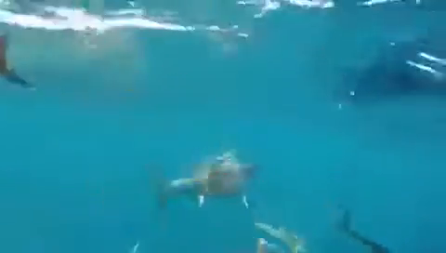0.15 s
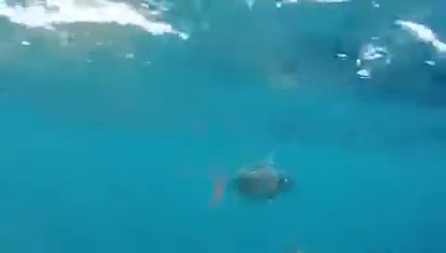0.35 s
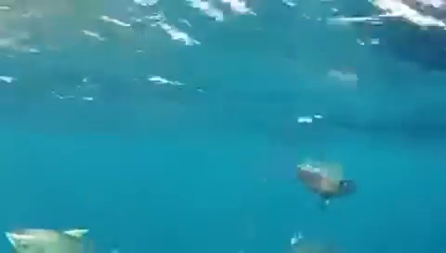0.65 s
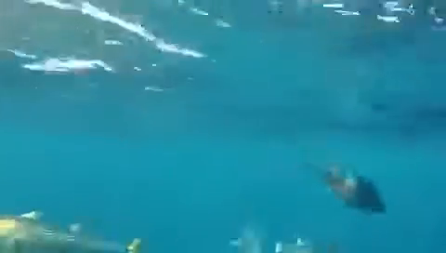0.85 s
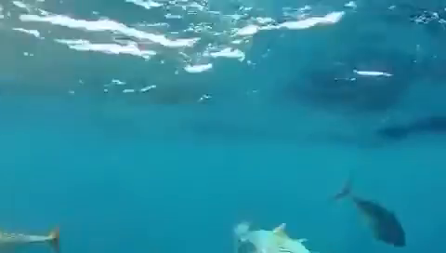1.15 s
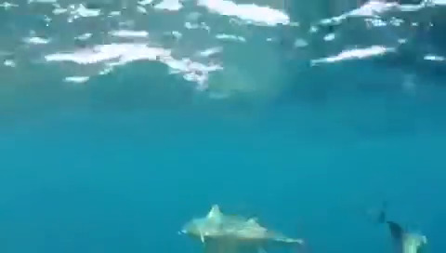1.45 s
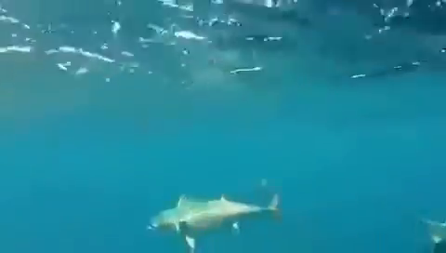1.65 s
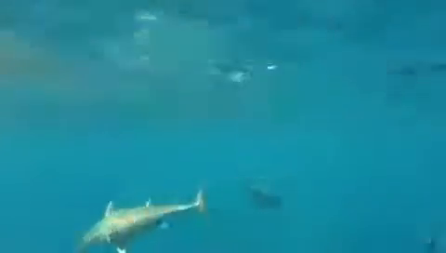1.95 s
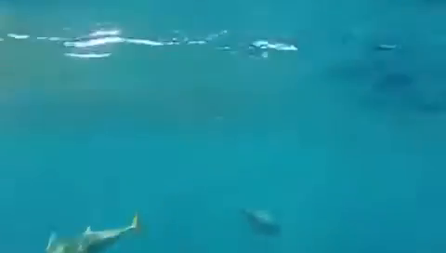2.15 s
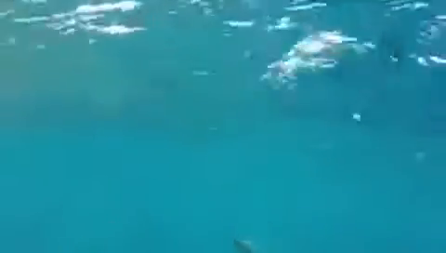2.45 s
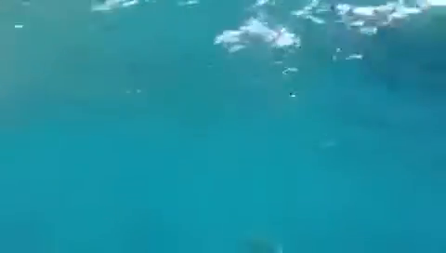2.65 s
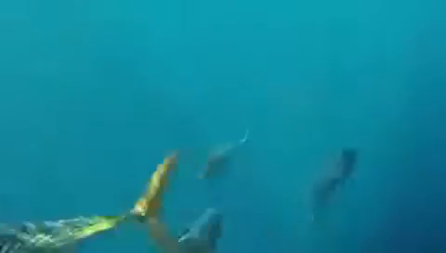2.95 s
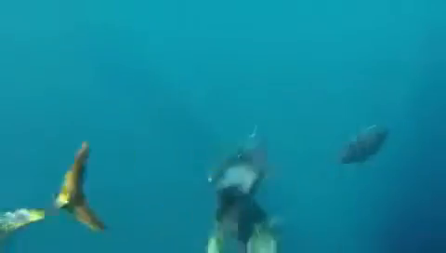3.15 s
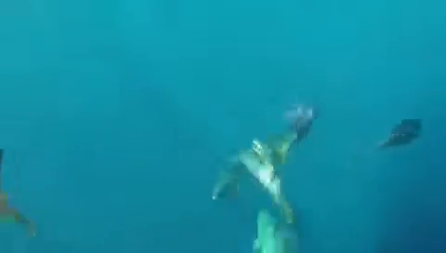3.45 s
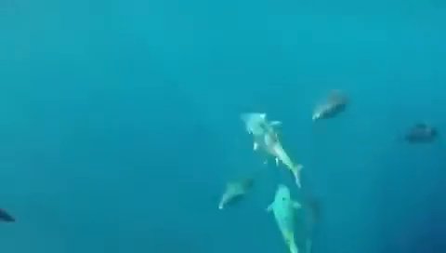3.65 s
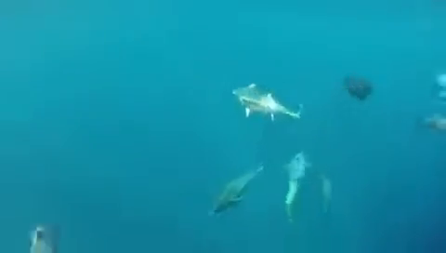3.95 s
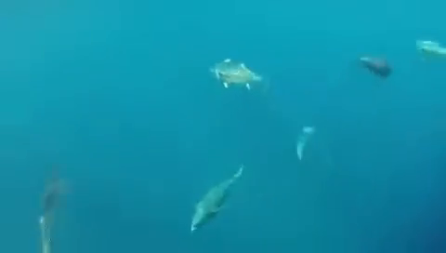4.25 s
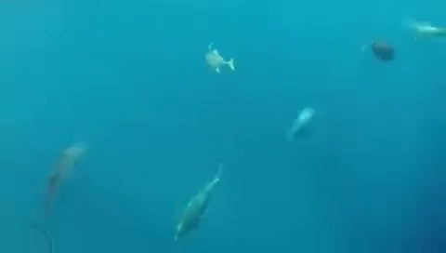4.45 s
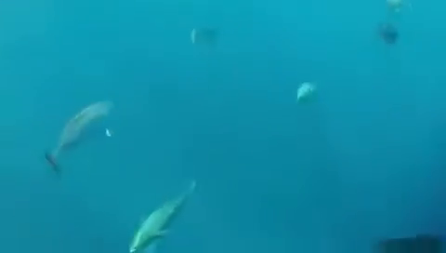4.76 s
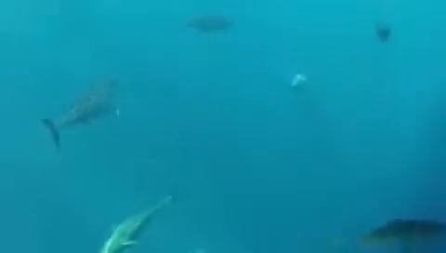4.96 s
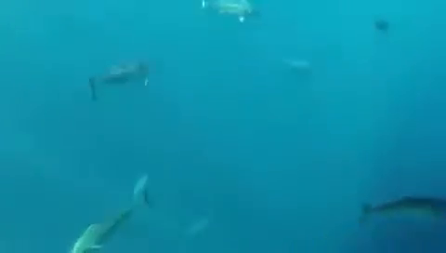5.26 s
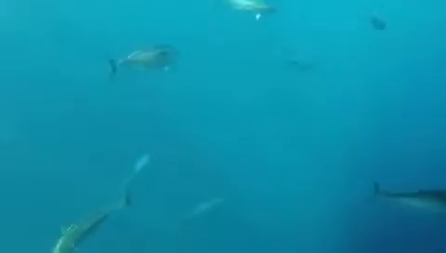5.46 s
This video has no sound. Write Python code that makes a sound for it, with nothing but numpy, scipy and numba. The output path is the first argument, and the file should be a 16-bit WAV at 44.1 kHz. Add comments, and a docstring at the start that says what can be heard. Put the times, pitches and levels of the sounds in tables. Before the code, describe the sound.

Muffled twin-engine hum heard through seawater, with bumps, tiny ticks and bubble plinks, dipping briefly to silence midway before returning stronger.

```python
"""A boat's two engines drone through the sea, heard by a camera microphone in a sealed housing.
Beating sines on the shaft orders make the drone; noise in hull and housing resonances adds boom, rattle and wash.
The housing is bumped, bubbles plink and tick, water surges on it, and a thin hiss of bubbles lies behind.
A far shot fades out and a nearer one fades in.
The camera samples slowly and holds each value, which mirrors the drone into the treble."""
import sys
import numpy as np
from scipy import signal
from scipy.fft import rfft, irfft
from scipy.io import wavfile
from scipy.ndimage import uniform_filter1d
from numba import njit

SR = 44100
rng = np.random.default_rng(int(sys.argv[2]) if len(sys.argv) > 2 else 0)


def store_pcm(level_fs):
    """Save levels as 16-bit WAV."""
    pcm = np.round(np.clip(level_fs, -1, 1) * 32767).astype(np.int16)
    wavfile.write(sys.argv[1], SR, np.atleast_2d(pcm).T)


N = 246959

# Bubble hiss in the open sea. Each row: frequency in Hz, relative density in dB per Hz.
SEA_COLOUR = [(1350, -24), (2300, -4), (3000, -12.5), (3490, -18.5), (3930, -9), (4370, -17.5),
              (4920, -16.5), (5900, -18), (7670, -53), (13000, -120)]
# Blows on the housing. Each row: start in seconds, peak in dB, contact in ms (width at half force).
BUMPS = [(1.069, -37.5, 1.06), (1.099, -27.5, 1.56), (1.1084, -28, 1), (1.1165, -34.5, 2.8),
         (1.128, -34.5, 1.1)]
# How the struck housing rings. Each row: frequency in Hz, relative level in dB, 60 dB decay in seconds.
HOUSING_MODES = [(56, 10, 0.14), (184, 9.5, 0.11), (377, 7.5, 0.15), (523, 11, 0.03), (684, 5, 0.056),
                 (985, -11, .03)]
# Short rings of bubbles and of taps on the housing.
# Each row: start in seconds, peak in dB, frequency in Hz, 60 dB decay in seconds.
PLINKS = [(2.426, -60, 5400, .02), (2.4445, -34, 650, 0.012), (2.448, -37.5, 1017, .03),
          (2.449, -40, 1250, 0.016), (2.472, -47.5, 2850, 0.041), (2.559, -36.5, 1358, 0.084),
          (2.557, -44, 1670, 0.044), (3.714, -45, 2860, 0.034), (4.199, -38.5, 1670, 0.044),
          (4.431, -46, 1710, .03), (4.654, -50, 1670, 0.028)]
# Tiny ticks. Each row: start in seconds, ring peak in dB, snap peak in dB.
TICKS = [(1.348, -48, -56), (1.367, -60, -40.5), (1.671, -53, -55), (1.684, -57, -59), (1.701, -60, -62),
         (1.716, -52, -44), (1.7205, -49, -50), (1.726, -61, -61), (1.746, -56, -57), (1.772, -47, -47),
         (1.800, -61, -61), (1.8097, -54, -56), (1.820, -60, -62), (1.913, -60, -62), (1.925, -62, -64),
         (3.885, -68, -60), (3.894, -66, -61), (3.913, -59, -57), (4.179, -68, -58), (5.377, -62, -53)]
# Water surging on the housing. Each row: moment in seconds, level of the low rumble in dB.
SURGES = [(.3, -70), (1.25, -57), (1.65, -51.5), (2.5, -62), (3.15, -57), (3.63, -55), (4.15, -63),
          (4.64, -53), (5.08, -50), (5.5, -52)]
# A wider hiss in the near shot. Each row: time in seconds, level in dB.
NEAR_HISS_LEVELS = [(3.1, -75), (4.1, -73.5), (4.6, -81.5), (5.1, -81), (5.4, -75)]
# Low resonances of hull and housing that noise rings.
# Each row: frequency in Hz, width of one pass in Hz, relative level in dB.
BOOM_MODES = [(116.3, 39, -6), (203, 84, -4), (369, 355, -1.5), (479.4, 100, -3), (666.6, 127, 0.5)]
# Higher resonances of hull and housing.
# Each row: frequency in Hz, width of one pass in Hz, relative level in dB.
RATTLE_MODES = [(968, 47, -10.5), (1370, 156, 1.5), (1902, 165, 3), (2200, 400, -3.5), (2856, 750, -5),
                (2875, 270, -17.5)]
# The boat in the far shot, then in the near one. Each row: time in seconds, drone in dB, rattle in dB.
SHOT_LEVELS = [
    [(0.0, -45, -53.5), (0.39, -42.5, -51.5), (1.1, -43, -51), (1.25, -44, -52), (2.34, -46.5, -56),
     (2.93, -42.5, -50.5)],
    [(3.1, -38, -48), (3.31, -37, -47), (4.52, -32.5, -48.5), (4.86, -32.5, -47.5), (5.14, -32, -47),
     (5.6, -31, -47.5)],
]
# Shaft orders from afar. Each row: multiple of the shaft rate, relative level in dB.
FAR_ORDERS = [(1, -15.5), (2, -17), (3, -15.5), (4, -5.5), (5, -10), (6, -15.5), (7, -7.5), (8, -15.5),
              (9, -16.5), (10, -11), (11, -2), (12, -10), (13, -4.5), (14, -0.5), (15, -9.5), (16, -3),
              (17, -9), (18, -15), (19, -11.5), (20, -16), (21, -15), (22, -12.5), (23, -11), (24, -2),
              (25, -13.5), (26, -10.5), (27, -6.5), (28, -6.5), (29, -12.5), (30, -7), (31, -16.5),
              (32, -18.5), (33, -17), (34, -23.5), (35, -22), (36, -24), (37, -18.5), (38, -20.5),
              (39, -38), (40, -15.5), (41, -14), (42, -24.5), (43, -47), (44, -35), (45, -35), (46, -35),
              (47, -34), (48, -24), (49, -24), (50, -14), (51, -26.5), (52, -20.5), (53, -12), (54, -19),
              (55, -33), (56, -16.5), (57, -37), (58, -18.5), (59, -24), (60, -31), (61, -31), (62, -21),
              (63, -27.5), (64, -26.5), (65, -32), (66, -41), (67, -27), (68, -23), (69, -20), (70, -25.5),
              (71, -14), (72, -14), (73, -7), (74, -12), (75, -21.5), (76, -10.5), (77, -17), (78, -22.5),
              (79, -15), (80, -18), (81, -31), (82, -23), (83, -16.5), (84, -15), (85, -25), (86, -35)]
# Shaft orders from nearer. Each row: multiple of the shaft rate, relative level in dB.
NEAR_ORDERS = [(1, -20), (2, -22), (3, -21), (4, -2.5), (5, -7), (6, -11), (7, -14.5), (8, -8.5), (9, -13),
               (10, -5.5), (11, -4), (12, -10), (13, -5), (14, -0.5), (15, -8.5), (16, -1), (17, -9),
               (18, -17), (19, -18), (20, -14), (21, -23), (22, -13.5), (23, -14), (24, -3.5), (25, -21.5),
               (26, -16), (27, -25.5), (28, -10.5), (29, -20), (30, -8), (31, -16), (32, -18.5),
               (33, -16.5), (34, -26.5), (35, -30), (36, -27), (37, -38), (38, -32), (39, -46), (40, -16.5),
               (41, -21), (42, -38), (43, -37), (44, -48), (45, -45), (46, -41), (47, -51), (48, -34),
               (49, -26), (50, -24), (51, -21), (52, -24), (53, -16.5), (54, -24), (55, -19.5), (56, -25),
               (57, -28), (58, -25.5), (59, -36), (60, -25.5), (61, -31.5), (62, -32), (63, -27), (64, -38),
               (65, -32), (66, -40), (67, -41), (68, -33), (69, -24), (70, -19.5), (71, -32), (72, -24),
               (73, -21.5), (74, -16.5), (75, -33), (76, -35), (77, -22), (78, -32), (79, -28), (80, -41.5),
               (81, -33), (82, -31), (83, -19), (84, -27), (85, -28.5), (86, -40.5)]
# Orders of the second engine. Each row: multiple of the shaft rate, relative level in dB far and near,
# moment in step with the first engine in seconds, far and near.
TWIN_ORDERS = [(4, -23.5, -17.5, 2.34, 4.72), (7, -16.5, -10.5, 1.516, 4.88), (8, -10, -6, 1.94, 4.41),
               (10, -16, -10, 1.656, 5.5), (13, -24, -15, 1.62, 5.6), (14, -14.5, -17, 1.68, 4.4),
               (24, -11.5, -22, 1.51, 4.45)]
# Orders that grow or sink as the camera moves. Each row: multiple, slope in dB per second far and near.
ORDER_DRIFT = [(4, 0, -.5), (5, 0, -3), (8, -3, 1.5), (10, -0.1, -1), (12, 1, -2.5), (11, 0, 2.5),
               (14, -0.5, 1.5), (16, 0.5, 2.2), (17, 3.5, 0.5), (24, 3, 3), (30, 2.5, -7.5), (26, 2, 0),
               (27, 1, -4), (31, -1, -6), (32, 3, 2.5), (40, 1, 1.5), (73, -0.5, -2.5)]
# Single orders that swell or dip for a moment.
# Each row: centre in seconds, multiple, change in dB, time from centre to 1/e in seconds.
ORDER_SWELLS = [(.7, 73, 4, 0.31), (.7, 28, 3, .4), (.65, 30, -9, .15), (2.05, 4, -5.5, .15),
                (2.6, 4, -7, .15), (3.6, 8, -6, 0.38), (3.6, 24, -6, 0.16), (3.9, 30, 5.5, 0.27),
                (4.62, 5, -12, 0.23), (4.85, 4, 3, .15), (5.13, 4, -9, .1), (5.15, 5, -13, .1),
                (5.452, 5, 6.5, .2)]

SEA_DB = -67
TICK_HZ, TICK_T60_S, SNAP_HZ, SNAP_T60_S = 5120, 0.011, 4300, 0.002
SNAP_DELAY_S = 0.0004  # the ring starts first but builds more slowly
FAINT_TICKS, FAINT_DB = 10, -68  # strewn at random, each up to 6 dB weaker
SURGE_S, CALM_DB = 0.15, -32.5  # time from peak to 1/e; the calm between, against the drone
GEAR_HZ, GEAR_WIDTH_HZ, GEAR_DB = 3893, 110, -75
NEAR_HISS_HZ, NEAR_HISS_WIDTH_HZ = 3850, 420
SHAFT_HZ, TWIN_FASTER_HZ = 25.825, 0.2457  # the second engine turns a little faster
WANDER_RAD, WANDER_PER_S = 0.036, 2.5  # the shaft runs a little ahead and behind
RATTLE_FROM = 35  # first order that belongs to the rattle
BOOM_DB, RATTLE_DB = -6.5, -3  # wash against the tones
FIRM_DB, FIRM_SHARE = -9, 0.58  # orders louder than this swell at random only by this share
FAR_MIDDLE_S, NEAR_MIDDLE_S = 1.5, 4.3  # where the drift of the orders crosses zero
CUT_S, FADE_OUT_S, FADE_IN_S, FADE_POWER = 3.0115, 0.11, 0.095, 0.99
EASE_S = 0.004
GUARD_HZ, CAMERA_HZ, HOLD, TOP_HZ = 5700, 12000, 4, 15020  # HOLD in fast samples


def undb(db):
    """Amplitude factor of a level in dB."""
    return 10 ** (np.asarray(db) / 20)


def level(x, db):
    """Scale to an rms level in dB."""
    return x * undb(db) / np.sqrt(np.mean(x ** 2))


def walk(rate):
    """Random levels joined by straight lines, rate a second; spread near 1.3."""
    steps = rng.standard_normal(int(N / SR * 60) + 2)
    return np.interp(np.arange(N) / SR * rate, np.arange(len(steps)), steps) * 1.61


def ring(x, hz, width):
    """Resonance applied twice, for dark valleys."""
    b, a = signal.iirpeak(hz, hz / width, SR)
    once = signal.lfilter(b, a, x)
    return signal.lfilter(b, a, once)


def add(out, s, sound):
    """Place a sound at s seconds."""
    i = int(s * SR)
    out[i:i + len(sound)] += sound[:len(out) - i]


def mode(hz, t60, rise_cycles):
    """A damped ring that builds smoothly over its first cycles."""
    t = np.arange(int(t60 * SR)) / SR
    risen = np.minimum(t * hz / max(rise_cycles, .01), 1)
    build = np.sin(np.pi / 2 * risen) ** 2
    decay = np.exp(-np.log(1000) * t / t60)
    return np.sin(2 * np.pi * hz * t) * decay * build


def wash(modes, turn, throb, flicker_db):
    """Noise in resonances, throbbing with the firings (two a turn), each flickering alone."""
    out = 0
    for hz, width, db in modes:
        beat = 1 + throb * np.cos(2 * turn + rng.uniform(0, 2 * np.pi))
        noise = level(ring(rng.standard_normal(N), hz, width), db)
        out = out + noise * beat * undb(flicker_db * walk(12.))
    return level(out, 0)


def sea():
    """Thin hiss of tiny bubbles: coloured noise, a little grainy."""
    hz = np.arange(N // 2 + 1) * SR / N + 1e-9
    colour_hz, colour_db = np.transpose(SEA_COLOUR)
    colour = undb(np.interp(np.log(hz), np.log(colour_hz), colour_db))
    grains = rng.standard_normal(N) * undb(1.7 * walk(55.) + .7 * walk(6.))
    return level(irfft(rfft(grains) * colour, N), SEA_DB)


def plinks_and_ticks():
    """Bubbles and light taps: short damped rings, each tick with a broad snap besides."""
    out = np.zeros(N)
    faint = [(a * N / SR, FAINT_DB - 6 * b, FAINT_DB - 6 * c) for a, b, c in rng.random((FAINT_TICKS, 3))]
    rings = [(row, 3.) for row in PLINKS]  # with the cycles each takes to build
    for s, ring_db, snap_db in TICKS + faint:
        rings.append(((s, ring_db, TICK_HZ, TICK_T60_S), 5.))
        rings.append(((s + SNAP_DELAY_S, snap_db, SNAP_HZ, SNAP_T60_S), .5))
    for (s, db, hz, t60), rise_cycles in rings:
        sound = mode(hz, t60, rise_cycles)
        add(out, s, undb(db) * sound / np.abs(sound).max())
    return out


def bumps():
    """A blow pushes the housing and lets it spring back; a longer, softer one leaves upper modes quiet."""
    out = np.zeros(N)
    body = np.zeros(SR // 4)
    for hz, db, t60 in HOUSING_MODES:
        add(body, 0, undb(db) * mode(hz, t60, 0))
    for s, db, contact_ms in BUMPS:
        force = np.hanning(int(contact_ms * SR / 500) + 3)
        blow = np.convolve(body, np.diff(force))
        add(out, s, undb(db) * blow / np.abs(blow).max())
    return out


def surges(t, turn, drone_db):
    """Water surging on the housing: low rumble in noise that swells over a calm tied to the drone."""
    surging = undb(drone_db + CALM_DB)
    for at, db in SURGES:
        surging = surging + undb(db) * np.exp(-((t - at) / SURGE_S) ** 2)
    return surging * wash([(27.3, 8, -2.5), (55, 91, -4)], turn, throb=0, flicker_db=5.0)


def gear_hiss(t, turn):
    """Gear hiss: noise in a narrow resonance far off, in a wider one nearer, throbbing with the firings."""
    narrow = wash([(GEAR_HZ, GEAR_WIDTH_HZ, 0)], turn, throb=0.34, flicker_db=2.0)
    wide = wash([(NEAR_HISS_HZ, NEAR_HISS_WIDTH_HZ, 0)], turn, throb=0.33, flicker_db=3.0)
    near_db = np.interp(t, *np.transpose(NEAR_HISS_LEVELS))
    return np.where(t < CUT_S, undb(GEAR_DB) * narrow, undb(near_db) * wide)


@njit
def comb(turn, orders, gains, sway, step):
    """Sines on the shaft angle; gain and phase of each drift between coarse points."""
    out = np.zeros(len(turn))
    for k in range(gains.shape[0]):
        for i in range(len(turn)):
            j, u = i // step, (i % step) / step
            g = gains[k, j] + u * (gains[k, j + 1] - gains[k, j])
            p = sway[k, j] + u * (sway[k, j + 1] - sway[k, j])
            out[i] += g * np.sin(orders[k] * turn[i] + p)
    return out


def engine_tones(turn, first, last, swell_db, sway_rad):
    """Shaft orders of both engines; moving water paths make each swell and slip in phase alone."""
    step = 2048  # samples between coarse points
    s = np.arange(N // step + 2) * step / SR

    def shot(far, near):
        return np.where(s > CUT_S, near, far)

    far_orders = np.array(FAR_ORDERS)[first - 1:last, 1:]
    near_orders = np.array(NEAR_ORDERS)[first - 1:last, 1:]
    db = shot(far_orders, near_orders)
    # together the first engine's orders have unit power before they move
    norm_db = 10 * np.log10(np.sum(undb(db) ** 2, axis=0) / 2)
    slow = uniform_filter1d(rng.standard_normal((2, len(db), len(s))), size=5, axis=2) * np.sqrt(5)
    share = np.where(db - norm_db > FIRM_DB, FIRM_SHARE, 1)
    path_db = swell_db * slow[0] * share - norm_db
    for order, far, near in ORDER_DRIFT:
        if first <= order <= last:
            path_db[order - first] += shot(far, near) * (s - shot(FAR_MIDDLE_S, NEAR_MIDDLE_S))
    for at, order, rise_db, half_s in ORDER_SWELLS:
        if first <= order <= last:
            path_db[order - first] += rise_db * np.exp(-((s - at) / half_s) ** 2)
    phase = rng.uniform(0, 2 * np.pi, (len(db), 1)) + sway_rad * slow[1]
    rows = [(first + k, db[k] + path_db[k], phase[k]) for k in range(len(db))]
    # the faster engine runs ahead in phase, so its orders beat against the first's
    for order, far_db, near_db, far_s, near_s in TWIN_ORDERS:
        if first <= order <= last:
            k = order - first
            lead = 2 * np.pi * order * TWIN_FASTER_HZ * (s - shot(far_s, near_s))
            rows.append((order, shot(far_db, near_db) + path_db[k], phase[k] + lead))
    orders, gains_db, phases = (np.array(c, float) for c in zip(*rows))
    return comb(turn, orders, undb(gains_db), phases, step)


def hull_rattle(turn):
    """The upper shaft orders, with noise ringing the higher resonances of hull and housing."""
    tones = engine_tones(turn, RATTLE_FROM, len(FAR_ORDERS), swell_db=1.5, sway_rad=0.39)
    noise = wash(RATTLE_MODES, turn, throb=0.16, flicker_db=0.5)
    return level(tones + undb(RATTLE_DB) * noise, 0)


def engine_drone(turn):
    """The lower shaft orders of both engines, with noise ringing the low resonances."""
    tones = engine_tones(turn, 1, RATTLE_FROM - 1, swell_db=3.0, sway_rad=0.16)
    noise = wash(BOOM_MODES, turn, throb=0.32, flicker_db=1.0)
    return level(tones + undb(BOOM_DB) * noise, 0)


def boat():
    """All that follows the shaft or its loudness: drone, hull rattle, gear hiss and surging water."""
    t = np.arange(N) / SR
    s, *columns = np.transpose(np.vstack(SHOT_LEVELS))
    drone_db, rattle_db = (np.interp(t, s, c) for c in columns)
    turn = 2 * np.pi * SHAFT_HZ * t + WANDER_RAD * walk(WANDER_PER_S)  # shaft angle in radians
    drone = undb(drone_db) * engine_drone(turn)
    rattle = undb(rattle_db) * hull_rattle(turn)
    return drone + rattle + gear_hiss(t, turn) + surges(t, turn, drone_db)


def scene():
    """Sum the layers, faded out of the far shot and into the near one."""
    t = np.arange(N) / SR - CUT_S
    fade = np.clip(np.where(t < 0, -t / FADE_OUT_S, t / FADE_IN_S), 0, 1) ** FADE_POWER
    fade *= np.clip((N / SR - CUT_S - t) / EASE_S, 0, 1)  # the end is eased out
    layers = boat() + sea() + plinks_and_ticks() + bumps()
    return (layers * fade)[None]


def record(dry):
    """Camera microphone: guard filter, slow sampling with each value held, steep top cut."""
    margin = SR // 30
    run_on = np.pad(dry, ((0, 0), (margin, margin)), mode="reflect", reflect_type="odd")
    guard = signal.butter(4, GUARD_HZ, fs=SR, output="sos")
    guarded = signal.sosfiltfilt(guard, run_on)
    slow = signal.resample_poly(guarded, CAMERA_HZ, SR, axis=1)
    # holding leaves mirror images of the sound above half the slow rate
    held = signal.resample_poly(np.repeat(slow, HOLD, axis=1), SR, CAMERA_HZ * HOLD, axis=1)
    top_cut = signal.ellip(14, .3, 85, TOP_HZ, fs=SR, output="sos")
    return signal.sosfilt(top_cut, held)[:, margin:margin + N]


dry = scene()
out = record(dry)
store_pcm(out)
```